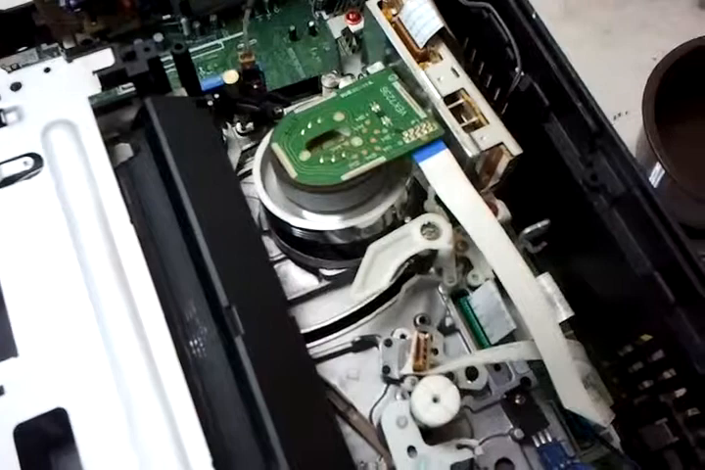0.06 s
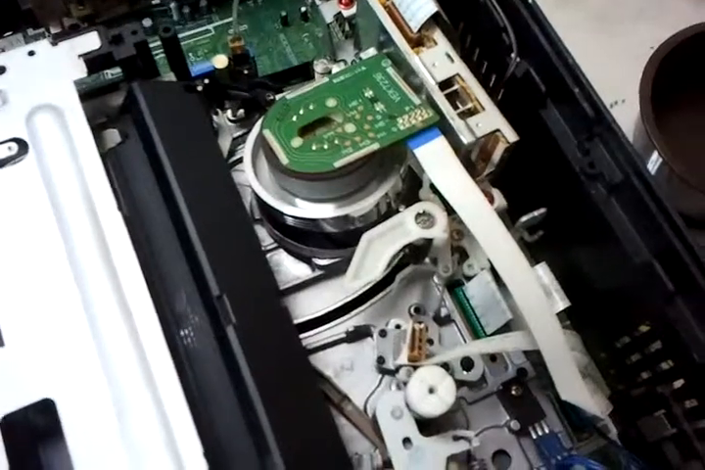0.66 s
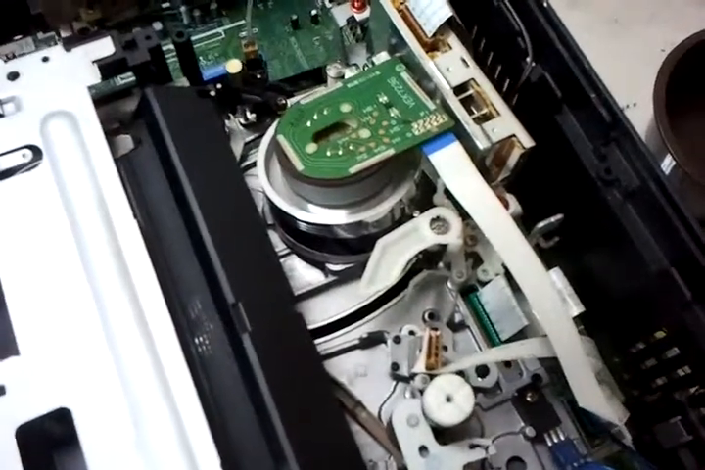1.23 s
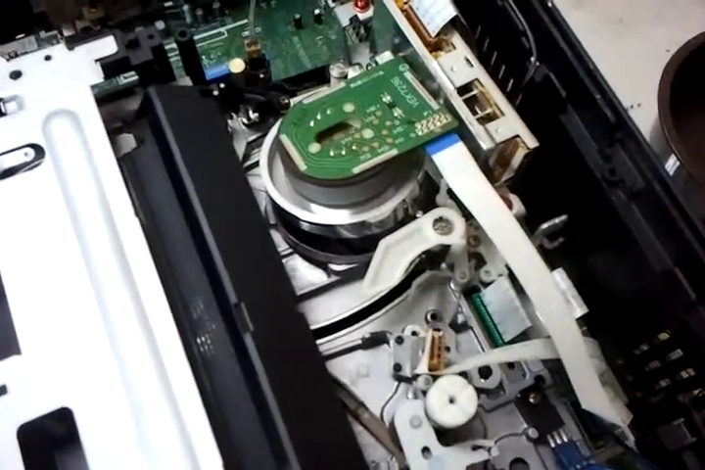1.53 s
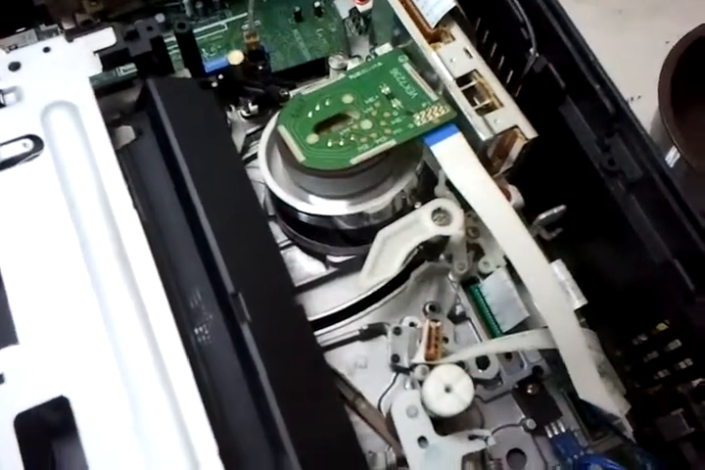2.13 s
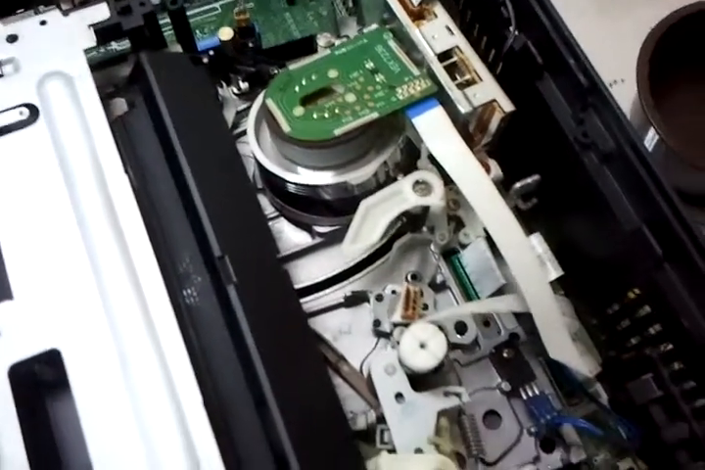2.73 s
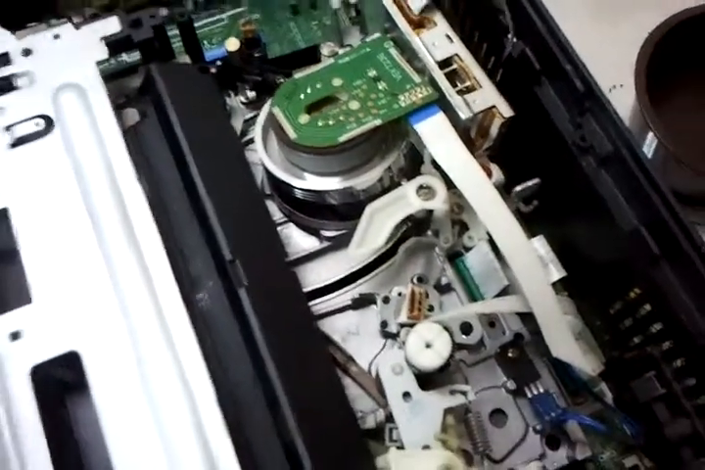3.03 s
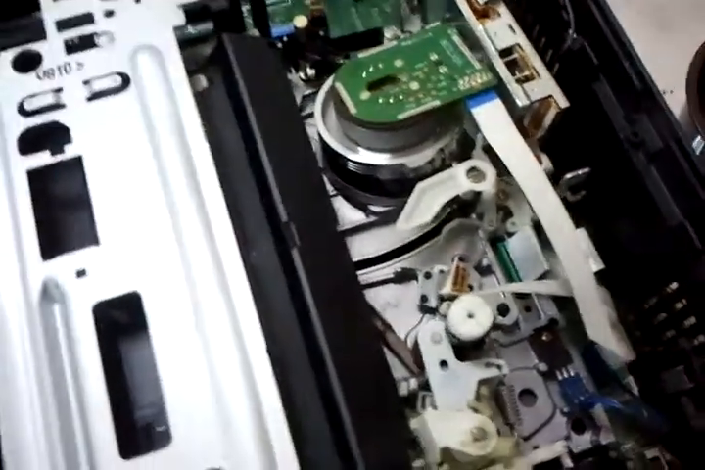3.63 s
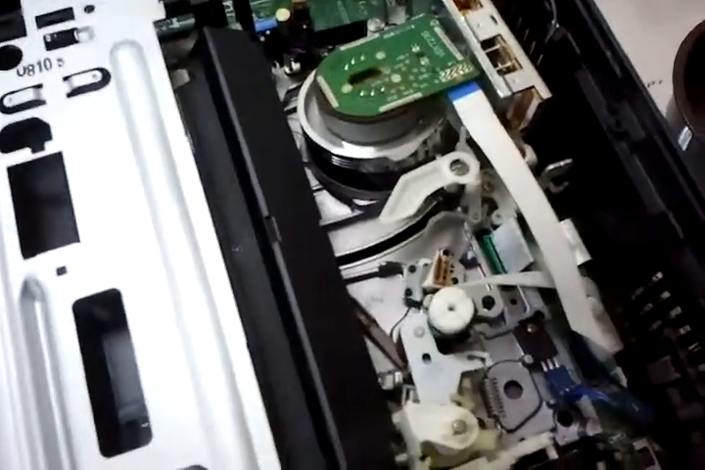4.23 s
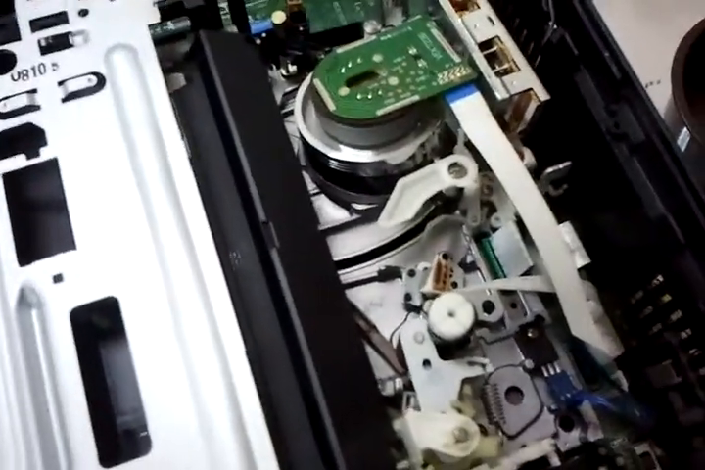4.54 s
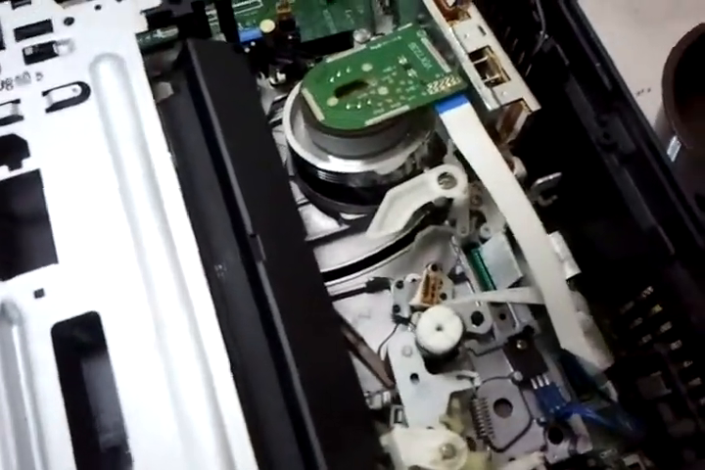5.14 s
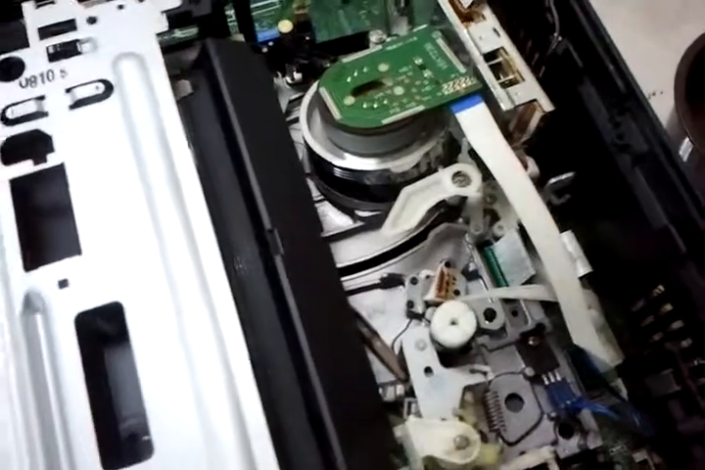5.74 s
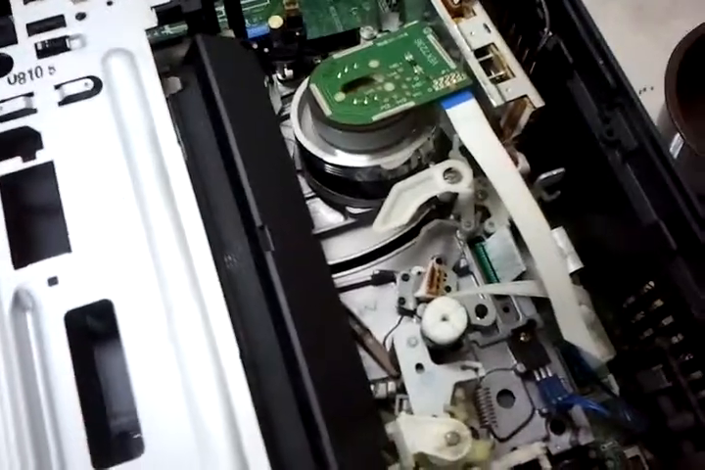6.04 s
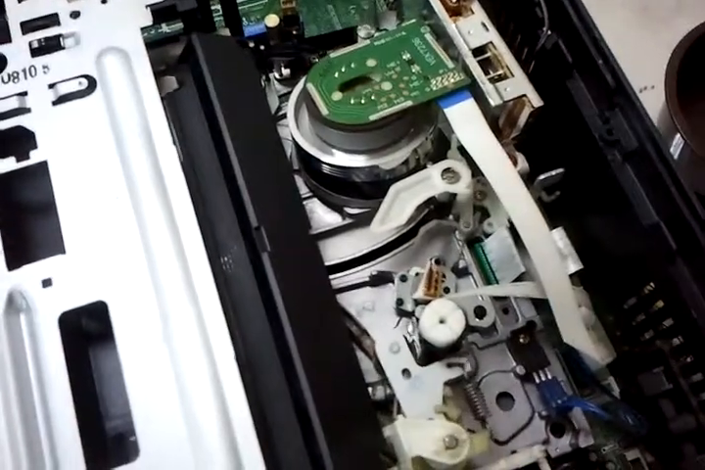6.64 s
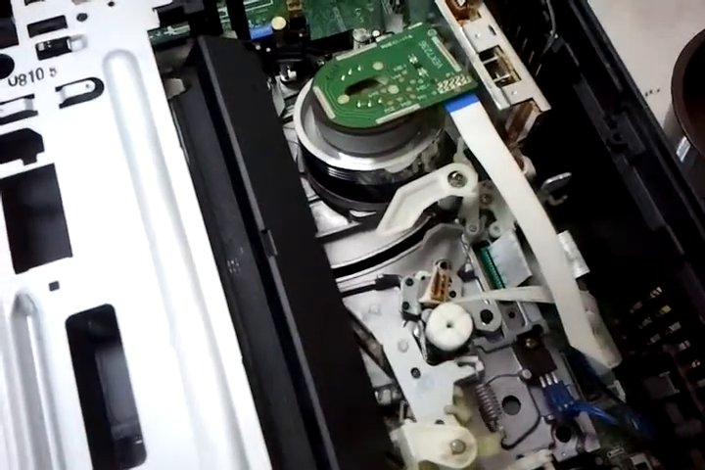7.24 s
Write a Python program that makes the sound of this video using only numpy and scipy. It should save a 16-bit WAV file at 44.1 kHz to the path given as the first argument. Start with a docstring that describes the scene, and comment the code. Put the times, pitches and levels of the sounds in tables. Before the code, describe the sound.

An open video tape deck is heard from close above, running from the start with a quiet, steady motor whine, bearing whir, tape hiss and a rapid, buzzy ticking from the spinning heads. A light lever click comes at 0.9 seconds and a sharper one at 1.5, followed by small bumps. Around 2 seconds the tape slackens and the ticking softens. The tape brushes its guides briefly at 2.7 seconds, and faint brushes and clicks follow until about 5. At 5.5 seconds a hard clack lands. The loading motor starts just after with a few clicks, humming and grinding through rattling gears, and drops in pitch as it takes the load. The loudest snap, a quick cluster, comes at 6.1 seconds, with another flurry of clicks near 6.9. Both motors keep running until the end, at about 7.5 seconds.

```python
"""An open video tape deck, heard from close above. From the start its head drum turns 25 times a second:
the motor whines and the heads tick against taut, hissing tape. Levers click and bump in the chassis;
about two seconds in the tape slackens and the ticking softens. At 5.5 s a hard clack lands, then the
loading motor starts, grinds through its gears and snaps the mechanism into its next position."""
import sys
import numpy as np
from scipy import signal
from scipy.fft import rfft, irfft, next_fast_len
from scipy.io import wavfile
from scipy.ndimage import uniform_filter1d, minimum_filter1d

SR = 44100
rng = np.random.default_rng(int(sys.argv[2]) if len(sys.argv) > 2 else 0)


def wrap_up_sound(samples):
    """Save the sound to the file named by the first command line argument, as 16-bit audio."""
    columns = np.atleast_2d(samples).T
    # keep every value between -1 and 1, then stretch to whole-number steps
    tamed = np.clip(columns, -1, 1)
    steps = np.round(tamed * 32767).astype(np.int16)
    wavfile.write(sys.argv[1], SR, steps)


N = 321048
TIME = np.arange(N) / SR

# Soft swells of low rumble, and of tape brushing its guides: centre_s, width_s, level_db
LOW_RUMBLE_SWELLS = [(.15, .2, -82), (1.3, 0.38, -80), (6.4, .3, -80), (7.27, .11, -66.5)]
TAPE_BRUSHES = [(2.673, 0.04, -44.5), (3.224, 0.037, -53.5), (4.073, 0.078, -55), (4.258, 0.0063, -48),
                (4.517, 0.02, -53), (4.616, 0.022, -52), (4.852, 0.012, -52)]
# Tone curves of drive rumble, bearing whir, tape hiss and a tape brush: freq_hz, gain_db
RUMBLE_EQ = [(25, -37.5), (55, -9.5), (110, -3), (200, -3), (260, 1), (500, 0.5), (900, 0), (1300, -11.5),
             (2200, -40)]
WHIR_EQ = [(600, -31.5), (1000, -7), (1300, -3), (1800, -2.5), (2200, -1.5), (2500, 1), (3300, -2.5),
           (4000, -2), (5500, -27)]
HISS_EQ = [(2000, -38.5), (3500, -7.5), (4200, 3), (4800, 3.5), (5400, 2), (6200, -12.5), (6700, -5),
           (7400, -13.5), (9000, -27.5)]
BRUSH_EQ = [(2000, -28), (4000, 3.5), (5500, 6), (7000, 2), (9000, -21)]
# Chassis peaks, and two notches, under the running drive: centre_hz, width_hz, gain_db
DRIVE_RESONANCES = [(1220, 24, 9.5), (1397, 50, 9), (1650, 76, 3.5), (1840, 45, 4), (2014, 98, 3.5),
                    (2160, 57, -4.5), (2360, 36, 6), (2466, 50, 2), (2855, 54, 7), (2930, 84, -5),
                    (4580, 170, 7), (4974, 100, 8.5), (5230, 120, 3), (6080, 140, 4)]

# Tape pulled taut round the drum (a reversed span is just a brief tug): start_s, end_s, tension_0_to_1
TAPE_PULLS = [(-1, 2.17, 0.9), (7, 6.8, 0.53)]
# Drag holds the drum below its speed: start_s, end_s
DRUM_DRAGS = [(1.87, 1.96), (4.03, 4.69)]
DRUM_TURNS_PER_S = 25

# The loading motor runs free, then slows under load: time_s, speed_turns_per_s
LOADER_SPEED_CURVE = [(5.72, 65.9), (5.836, 64.0), (5.924, 52.4), (6.002, 50.0), (6.076, 49.3),
                      (6.17, 50.7), (6.614, 50.0), (6.706, 49.0), (6.944, 49.0), (7.048, 46.3),
                      (7.184, 48.7), (7.28, 48.9)]
# Partials of the loading motor and of its worm gear: cycles_per_turn, level_db
HUM_PARTIALS = [(3, -13), (4, -8.5), (6, -3), (7, -7), (9, 0), (11, -20), (12, -11), (20, -10.5),
                (24, -9.5), (25, -2), (28, -8.5), (33, -7.5)]
WORM_PARTIALS = [(15, 0), (16, -2), (17, -13), (19, -12)]
# Tone curve of the gear rattle: freq_hz, gain_db
RATTLE_EQ = [(100, -40.5), (210, -6.5), (450, -1.5), (650, -1.5), (1000, 3.5), (1350, -0.5), (2000, -6.5),
             (3500, -4), (6400, -3), (8000, -19.5)]
# The gears strain against a lever: start_s, end_s, worm_gain_db, rattle_gain_db
GEAR_STRAINS = [(6.14, 6.3, 0, 3.5), (6.317, 6.68, 4.5, -1), (6.85, 7.5, 0.5, 5)]
LOADER_START_S, LOADED_TURNS_PER_S = 5.64, 47.4

# Tone curves of a hit's three layers (case, plastic, metal): freq_hz, gain_db
THUD_EQ = [(60, -25), (150, -11), (300, -6.5), (500, 6.5), (850, 0.5), (1200, 0), (2500, -49.5)]
CLACK_EQ = [(400, -41.5), (850, -6.5), (1250, 5), (1900, 3), (2300, 4.5), (3000, 2), (4000, -14)]
SNAP_EQ = [(1500, -38.5), (2800, -4), (3400, 4), (3800, -3), (4400, 4), (5300, 6), (6300, 2.5), (7200, -5),
           (9000, -19)]
# Ring of the struck chassis: centre_hz, width_hz, gain_db
CHASSIS_RING = [(410, 28, 3), (874, 55, 11), (1290, 65, 2), (1780, 110, 6), (2485, 75, 1.5), (2830, 70, 0),
                (3870, 37, 14.5), (4240, 100, 4.5), (4500, 56, -5), (5110, 110, 2.5), (5280, 120, 3),
                (5670, 44, 1), (6150, 56, 0)]
# Levers and latches strike: start_s, level_db, hardness_db, chatter_s, pitch_hz
LEVER_CLICKS = [(0.853, -37.5, 2.5, .0052, 2620), (1.5474, -30, 6.5, 0.0037, 3320),
                (1.682, -40.5, 1.5, 0.0064, 350), (2.141, -44.5, 5, 0.0071, 2280),
                (2.190, -47, 13, 0.0022, 5640), (3.743, -47.5, 2, .0043, 2400),
                (4.572, -49.5, -1, 0.0097, 1080), (5.452, -20.5, 9, 0.0032, 564),
                (5.64, -28, -1.5, 0.0011, 1290), (5.667, -37, 6, 0.0077, 4640),
                (5.723, -28, 6, 0.0021, 1610), (5.731, -30, 4, 0.008, 580), (5.942, -47, 7, 0.016, 1090),
                (6.134, -22, 13.5, 0.00082, 3140), (6.147, -21.5, 14, 0.0022, 4850),
                (6.1506, -17, 10, 0.0013, 823), (6.258, -36, 5.5, .0023, 3760),
                (6.30, -47.5, 9, 0.0043, 6200), (6.548, -46.5, 7, .005, 4500),
                (6.829, -33.5, 5.5, 0.0041, 3680), (6.848, -32.5, 10.5, 0.0069, 5270),
                (6.864, -33, 10.5, 0.012, 1820), (6.873, -29, 15.5, 0.0013, 4700),
                (7.036, -44, 2, 0.0053, 980)]
# An arm bumps softly against the case: start_s, level_db, shudder_s, pitch_hz
ARM_BUMPS = [(.857, -42.5, 0.018, 314), (1.016, -55, .003, 474), (1.56, -40.5, .0065, 760),
             (1.87, -47.5, 0.0069, 820), (2.025, -45.5, 0.021, 830), (2.15, -45, 0.028, 836),
             (2.193, -41, 0.0044, 830), (3.743, -51, .0043, 467), (4.665, -46.5, .0044, 775)]


def from_db(db):
    return 10 ** (np.asarray(db) / 20)


def unit_rms(x):
    return x / np.sqrt(np.mean(x ** 2) + 1e-20)


def add(out, start_s, sound):
    start = int(start_s * SR)
    out[start:start + len(sound)] += sound


def held(start, end, ramp_s):
    """A gate from start to end, with a straight fade across each edge."""
    return np.clip(np.minimum(TIME - start, end - TIME) / ramp_s + .5, 0, 1)


def bell(t, width_s):
    return np.exp(-.5 * (t / width_s) ** 2)


def swells(rows):
    """A smooth rise and fall of gain for each row."""
    return sum(from_db(db) * bell(TIME - centre_s, width_s) for centre_s, width_s, db in rows)


def drift(rate_hz):
    """A random wobble with an RMS of 1."""
    knots = rng.standard_normal(int(rate_hz * N / SR) + 2)
    return unit_rms(np.interp(TIME * rate_hz, np.arange(len(knots)), knots))


def colour(x, eq, resonances=()):
    """Minimum-phase EQ: a tone curve with resonances on it, falling 6 dB an octave past its ends."""
    size = 2 * next_fast_len(len(x) // 2 + SR // 20)
    hz = np.arange(size // 2 + 1) * SR / size + 1
    eq_hz, eq_db = np.transpose(eq)
    db = np.interp(np.log(hz), np.log(eq_hz), eq_db)
    db -= 20 * np.log10(np.maximum(1, hz / eq_hz[-1]) * np.maximum(1, eq_hz[0] / hz))
    for centre_hz, width_hz, gain_db in resonances:
        db += gain_db / (1 + (2 * (hz - centre_hz) / width_hz) ** 2)
    cepstrum = irfft(db * np.log(10) / 20)[:size // 2]
    cepstrum[1:] *= 2
    return irfft(rfft(x, size) * np.exp(rfft(cepstrum, size)))[:len(x)]


def rubbing(turns, nominal_hz, repeat):
    """Friction noise; the `repeat` share loops every turn, as the same surface passes again."""
    surface = rng.standard_normal(SR // nominal_hz)
    loop = surface[np.round(turns * len(surface)).astype(int) % len(surface)]
    return np.sqrt(repeat) * loop + np.sqrt(1 - repeat) * rng.standard_normal(N)


def drum_turns(sag_turns_per_s=.442, sag_s=.1):
    """Turns made so far: drag slows the drum, then the servo pulls it back to speed."""
    sag = sum((1 - np.exp(-np.maximum(TIME - start, 0) / sag_s)) * held(0, end, sag_s)
              for start, end in DRUM_DRAGS)
    return np.cumsum(DRUM_TURNS_PER_S - sag_turns_per_s * sag) / SR


def since_mark(turns, phase, count):
    """Seconds from the nearest of `count` evenly spaced marks on the drum."""
    return (((turns - phase) * count + .5) % 1 - .5) / count / DRUM_TURNS_PER_S


def low_rumble():
    """Soft swells of low rumble, early on and again while the loading motor runs."""
    rumble = colour(rng.standard_normal(N), [(20, -7.5), (45, -1), (110, -8), (300, -26.5)])
    return swells(LOW_RUMBLE_SWELLS) * unit_rms(rumble)


def transport(turns, taut):
    """The bed: rumble, bearing whir, tape hiss, brushes on the guides and the sizzle of head contact."""
    rumble = colour(rng.standard_normal(N), RUMBLE_EQ, [(199, 13, 13)])
    whir = colour(rubbing(turns, 25, repeat=.64) * from_db(1.2 * drift(200)), WHIR_EQ, DRIVE_RESONANCES)
    hiss = colour(rubbing(turns, 25, repeat=.12) * from_db(1.4 * drift(200)), HISS_EQ, DRIVE_RESONANCES)
    brush = colour(rng.standard_normal(N) * from_db(1.8 * drift(400)), BRUSH_EQ)
    sizzle_eq = [(4200, -16), (5300, 1), (5800, 2), (6400, -.5), (6550, -7.5), (8000, -20.5)]
    sizzle = colour(rubbing(2 * turns, 50, repeat=.26), sizzle_eq)
    return (from_db(-60.5 - .9 * taut) * unit_rms(rumble)
            + from_db(-53.5 + 1.2 * taut) * unit_rms(whir)
            + from_db(-54 + 1.5 * taut) * unit_rms(hiss)
            + swells(TAPE_BRUSHES) * unit_rms(brush)
            + from_db(-60 + 8.5 * taut) * unit_rms(sizzle))


def drum_motor(turns, taut):
    """A slowly fading whine, 36 cycles a turn. Drag ducks it and lifts an overtone that taut tape damps."""
    drag = sum(held(start, end, ramp_s=.027) for start, end in DRUM_DRAGS)
    cogging = 2 * np.pi * 36 * turns + .03 * drift(15)
    whine = from_db(-48.5 - .54 * TIME - 4.5 * drag + .35 * drift(12)) * np.sin(cogging)
    overtone = from_db(-71 + 3.5 * drag - 14 * taut + 2 * drift(10)) * np.sin(1.5 * cogging)
    return np.sqrt(2) * (whine + overtone)


def tape_tick(t, width_s, pitch_hz=3380):
    """The tape rings for a few cycles as a head pushes into it."""
    return bell(t, width_s) * np.cos(2 * np.pi * pitch_hz * t)


def heads(turns, taut, entry_turns=.407, rebound_lag_turns=.0818):
    """Two heads tick in turn, harder on taut tape; after one of them the tape rebounds."""
    entry_s = since_mark(turns, entry_turns, count=2)
    rebound_s = since_mark(turns, entry_turns + rebound_lag_turns, count=1)
    rebound_gain = from_db(-17 + 14 * taut)
    # the more the tape rebounds, the more one head is accented
    accent_db = 2.6 * rebound_gain * np.cos(2 * np.pi * (turns - entry_turns)) + .66 * drift(43)
    ticks = from_db(accent_db) * tape_tick(entry_s, width_s=.00065)
    rebound = from_db(2) * rebound_gain * tape_tick(rebound_s, width_s=.00076)
    # each head's edge scratches the tape 2 ms ahead of its tick
    scratch = rubbing(2 * turns, 50, repeat=1) * bell(entry_s + .002, width_s=.0015)
    scratch_eq = [(900, -17), (1650, 10.5), (2200, -2), (2700, -3), (4500, 1), (6300, 5.5), (7800, -6)]
    return from_db(-43 + 7 * taut) * (ticks + rebound + from_db(-6.5) * colour(scratch, scratch_eq))


def shaft_tone(turns, partials, waver_db):
    """Harmonics of a turning shaft; it runs unevenly, which smears the high ones most."""
    shaft = turns + .0012 * drift(24)
    tone = np.zeros(N)
    for cycles, db in partials:
        tone += from_db(db + waver_db * drift(25)) * np.sin(2 * np.pi * (cycles * shaft + rng.random()))
    return unit_rms(tone)


def loading_motor():
    """Motor hum, worm whine and gear rattle pulsing three times a turn; speed and strain ride the mix."""
    speed = np.interp(TIME, *np.transpose(LOADER_SPEED_CURVE))
    turns = np.cumsum(speed) / SR
    overspeed = speed - LOADED_TURNS_PER_S
    hum_db, worm_db, rattle_db = -53.5 + .24 * overspeed, -52, -51 + .5662 * overspeed
    for start, end, worm_gain_db, rattle_gain_db in GEAR_STRAINS:
        strain = held(start, end, ramp_s=.11)
        worm_db += worm_gain_db * strain
        rattle_db += rattle_gain_db * strain
    teeth = 1 + .45 * np.cos(2 * np.pi * 3 * turns)
    grind = rubbing(turns, 50, repeat=.32) * teeth
    rattle = from_db(rattle_db) * unit_rms(colour(grind, RATTLE_EQ, [(997, 29, 7), (6560, 72, 8.8)]))
    hum = from_db(hum_db) * shaft_tone(turns, HUM_PARTIALS, waver_db=2.5)
    worm = from_db(worm_db) * shaft_tone(turns, WORM_PARTIALS, waver_db=2.8)
    return held(LOADER_START_S, np.inf, ramp_s=.014) * (hum + worm + rattle)


def hit(chatter_s, pitch_hz, eq, t60_s, tail_db, tail_t60_s, note_db=12):
    """A contact chatters, then its crowded modes die fast, leaving a faint tail of case and room."""
    t = TIME[:SR // 3]
    attack = 1 - np.exp(-t / .0005)
    release_s = np.maximum(t - chatter_s, 0)
    decay = from_db(-60 * release_s / t60_s) + from_db(tail_db - 60 * release_s / tail_t60_s)
    own_note = (pitch_hz, pitch_hz / 7, note_db)
    ring = colour(rng.standard_normal(len(t) + SR // 20), eq, CHASSIS_RING + [own_note])[-len(t):]
    power = uniform_filter1d(ring ** 2, size=100)
    levelled = ring / np.sqrt(power + .25 * np.mean(power))
    return levelled * attack * decay


def levers():
    """A click layers case thud, plastic clack and metal snap, tilted by hardness; a bump only thuds."""
    out = np.zeros(N + SR)
    for start_s, db, hardness_db, chatter_s, pitch_hz in LEVER_CLICKS:
        thud = hit(chatter_s, pitch_hz, THUD_EQ, t60_s=.11, tail_db=-32, tail_t60_s=.36)
        clack = hit(chatter_s, pitch_hz, CLACK_EQ, t60_s=.067, tail_db=-17, tail_t60_s=.32)
        snap = hit(chatter_s, pitch_hz, SNAP_EQ, t60_s=.032, tail_db=-23.5, tail_t60_s=.3)
        click = from_db(-hardness_db) * thud + from_db(.6) * clack + from_db(hardness_db) * snap
        add(out, start_s, from_db(db) * click)
    for start_s, db, shudder_s, pitch_hz in ARM_BUMPS:
        bump = hit(shudder_s, pitch_hz, THUD_EQ, t60_s=.15, tail_db=-25, tail_t60_s=.36, note_db=13)
        add(out, start_s, from_db(db) * bump)
    # the clicks and bumps carry hardly any bass
    return signal.sosfilt(signal.butter(2, 175, "high", fs=SR, output="sos"), out[:N] + 1e-18)


def scene():
    """The mono mix; drum rotation and tape tension drive the running sounds together."""
    turns = drum_turns()
    taut = sum(tension * held(start, end, ramp_s=.44) for start, end, tension in TAPE_PULLS)
    running = drum_motor(turns, taut) + heads(turns, taut) + transport(turns, taut)
    return (running + loading_motor() + levers() + low_rumble())[None]


def record(dry, limit=.86, ceiling=.72):
    """The microphone passes little above 7 kHz; a fast limiter catches hard snaps, whose tips still clip."""
    heard = signal.sosfilt(signal.butter(10, 7200, fs=SR, output="sos"), dry)
    heard = signal.sosfilt(signal.cheby1(10, .1, 8900, fs=SR, output="sos"), heard)
    peak = -minimum_filter1d(-np.abs(heard), size=40)
    gain = uniform_filter1d(limit / np.maximum(peak, limit), size=40)
    clipped = np.clip(gain * heard, -ceiling, ceiling)
    return signal.sosfiltfilt(signal.cheby2(12, 40, 16660, fs=SR, output="sos"), clipped)


dry = scene()
out = record(dry)
wrap_up_sound(out)
```